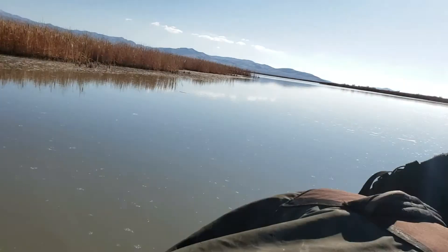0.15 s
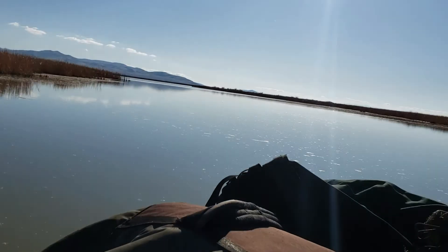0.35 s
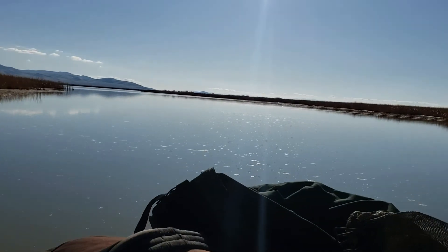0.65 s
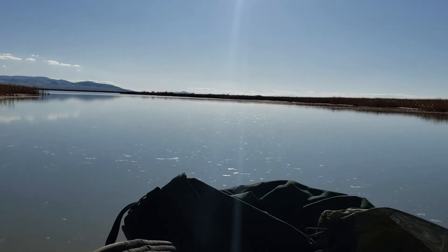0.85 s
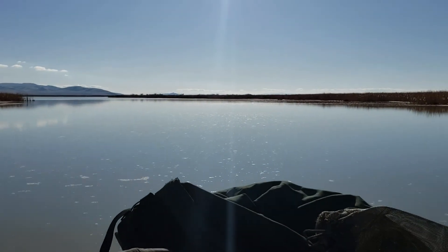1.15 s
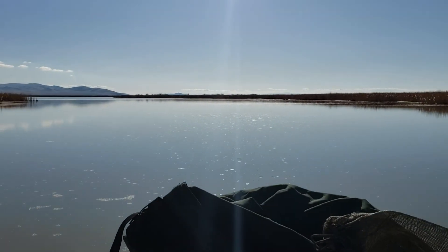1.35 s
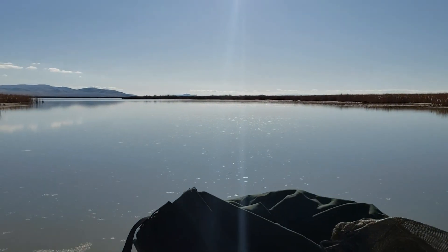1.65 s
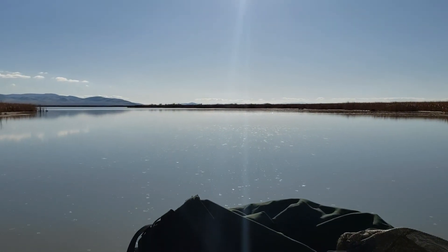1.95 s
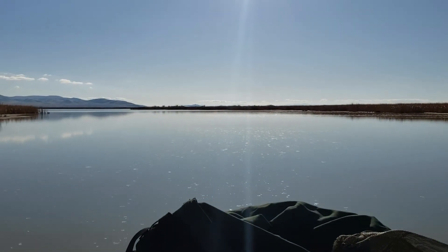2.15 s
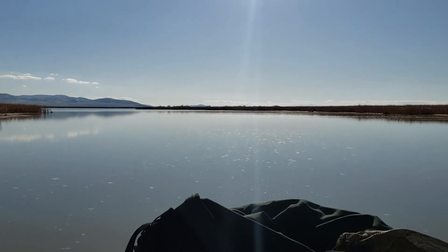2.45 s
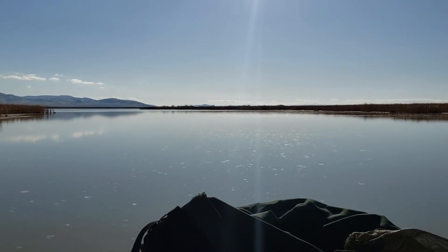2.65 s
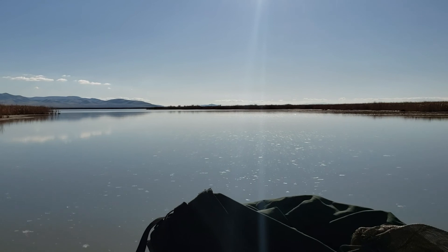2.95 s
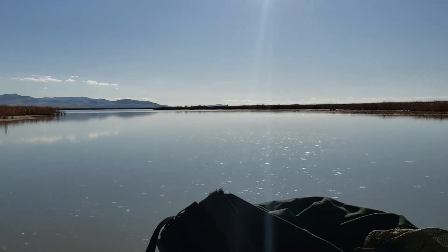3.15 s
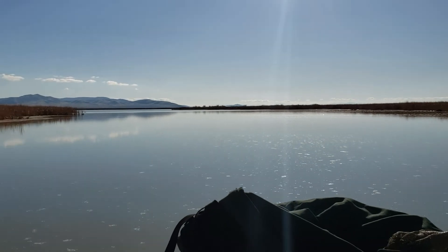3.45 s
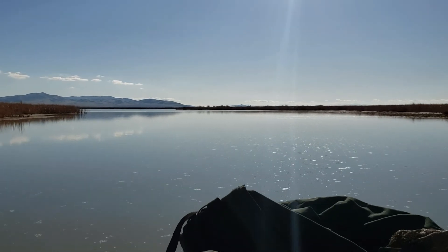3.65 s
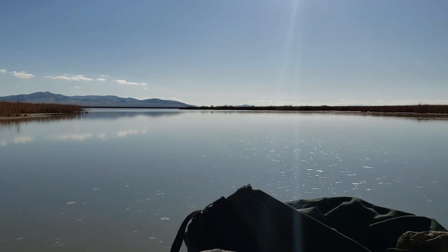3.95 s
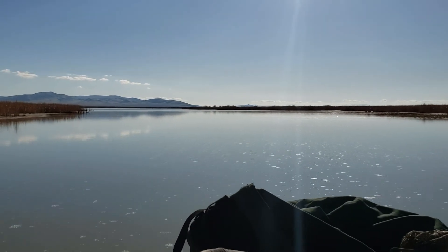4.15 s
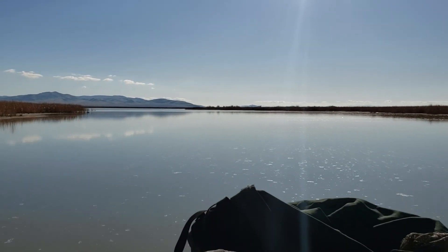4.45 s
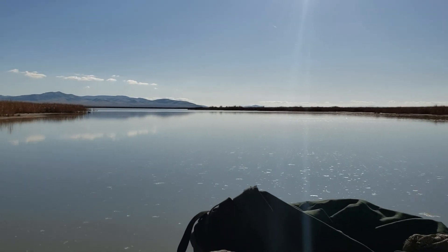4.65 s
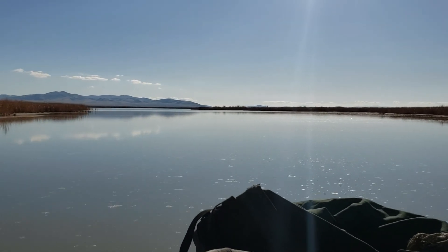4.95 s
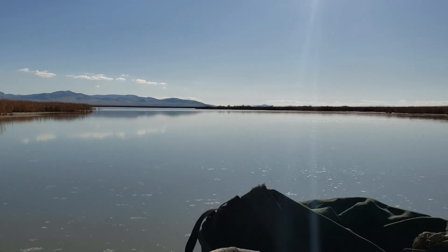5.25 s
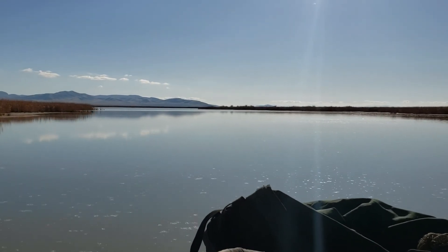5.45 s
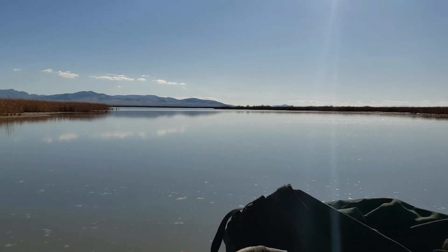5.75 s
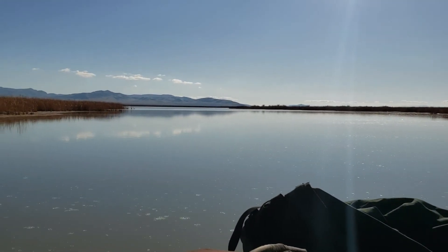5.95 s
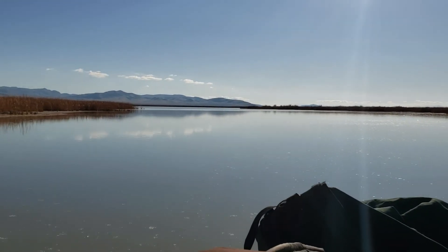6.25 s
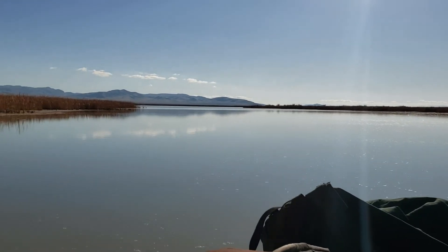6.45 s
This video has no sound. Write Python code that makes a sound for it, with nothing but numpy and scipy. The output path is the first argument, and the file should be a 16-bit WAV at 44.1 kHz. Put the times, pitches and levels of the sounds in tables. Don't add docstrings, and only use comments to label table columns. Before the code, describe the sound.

A two-cylinder boat engine runs flat out close behind a small open-air camera on a calm marsh. Its low throbbing drone hardly changes pitch, wrapped in rough block roar, mid-range whirr and quick valve clatter. Churned wake hisses briefly at the start, then a panel rattle swells around one second. Wind bumps the left and right microphones separately, most thickly from about two to three seconds.

```python
import sys
import numpy as np
from scipy import signal
from scipy.fft import rfft, irfft, next_fast_len
from scipy.io import wavfile
from scipy.ndimage import uniform_filter1d, map_coordinates

SR = 44100
rng = np.random.default_rng(int(sys.argv[2]) if len(sys.argv) > 2 else 0)


def wrap_up_sound(samples):
    columns = np.atleast_2d(samples).T
    tamed = np.clip(columns, -1, 1)
    steps = np.round(tamed * 32767).astype(np.int16)
    wavfile.write(sys.argv[1], SR, steps)


def convert_level_to_amplitude(level_db):
    exponent = np.asarray(level_db, float) / 20
    return 10 ** exponent


N = 291932

# t/s, firing cycle f/Hz, crank throb level/dB, exhaust bark level/dB
ENGINE_RUN = [(0.0, 33.42, -21.5, -23.5), (0.39, 33.24, -21.9, -23), (0.78, 33.55, -20.8, -23.5),
              (1.17, 33.23, -21, -23), (1.56, 33.3, -20.0, -22.5), (1.95, 32.96, -19, -23),
              (2.34, 33.49, -18.5, -23), (2.73, 33.46, -21, -23), (3.12, 33.2, -22.2, -23),
              (3.5, 33.07, -25, -23), (3.89, 33.279, -24.0, -23), (4.28, 33.1, -23.5, -23.5),
              (4.67, 33.1, -23.5, -22), (5.06, 33.2, -22, -22.5), (5.45, 33.09, -21.5, -21.5),
              (5.84, 33.27, -23.5, -21.5), (6.23, 33.045, -20.5, -21.4), (6.62, 33.14, -21, -22)]
# t/s, level/dB
SPRAY_LEVEL = [(0, -53), (.05, -54.5), (.3, -56), (.6, -60), (2.6, -60), (4.1, -58), (5.6, -55.5),
               (6.62, -56)]
# t/s, level/dB
SHUDDERS = [
    (.05, 1),
    (.16, 3),
    (.26, 5.5),
    (.83, -2),
    (1.0, 0),
    (1.18, 5),
    (1.34, 0),
    (1.88, 3),
    (3.91, 4.5),
    (4.1, 0),
]


def engine():
    cycle_hz, throb_db, bark_db = curves(ENGINE_RUN)
    spray_db, = curves(SPRAY_LEVEL)
    shudder_db = sum(db * bump(s, half_s=0.015) for s, db in SHUDDERS)
    shade_db = 3 * bump(0.38, half_s=0.17)
    turns = np.cumsum(cycle_hz + 0.0393 * wobble(12)) / SR - 0.025
    uneven_db = 1.1 * wobble(24)
    noise = block_roar(turns, throb_db, bark_db, shudder_db, shade_db)
    noise += whirr(turns, spray_db, shudder_db, shade_db)
    noise += valve_clatter(turns, spray_db)
    noise += spray(turns, spray_db)
    hull_shake_db = 0.39 * wobble(9)
    return exhaust(turns, throb_db, bark_db + uneven_db) + convert_level_to_amplitude(hull_shake_db) * noise


# order of the firing cycle, level/dB
EXHAUST_ORDERS = [(1, -25.5), (2, -0.5), (3, -10.5), (4, -11.5), (5, -4), (6, -7.5), (7, -16), (8, -19),
                  (9, -11.5), (10, -10), (11, -10.5), (12, -13), (13, -8.5), (14, -19), (15, -22),
                  (16, -26), (17, -20), (18, -21), (19, -19), (20, -20.5), (21, -32.5), (22, -21.5),
                  (23, -42), (24, -18.5), (25, -24.5), (26, -29), (27, -29.5), (28, -34), (29, -24),
                  (30, -26.5)]
# order of the firing cycle, rms level/dB
TOOTH_ORDERS = [(33, -49), (38, -58.5), (43, -55.5), (48, -51), (52, -53), (54, -55.5), (57, -51),
                (59, -58), (61, -46.5), (63, -53)]


def exhaust(turns, throb_db, bark_db):
    third_db = -35.5 + 0.46 * (throb_db + 20) + 2.8 * wobble(6.6)
    fourth_db = -36 - 1.05 * (throb_db + 22) + 2.8 * wobble(5.2)
    load_db = {1: throb_db, 2: throb_db, 3: third_db + 12.5, 4: fourth_db + 12}
    _, level = np.transpose(EXHAUST_ORDERS)
    fade = level[-1] - 0.37 * np.arange(1, 38)
    levels = np.concatenate([[0], level, fade])
    out = np.zeros((2, N))
    for k in range(1, 68):
        loose = min(k / 40, 1)
        phase = firing(k)
        if k > 14:
            phase += np.pi * k * k / 23
        slip = (0.15 * loose + 0.55 * (k > 13)) * wobble(3)
        drift_db = (0.79 + 1.9 * loose) * wobble(2.51)
        if k > 13:
            drift_db += 1.7 - 4 * abs(wobble(1.507))
        if k > 30:
            drift_db -= 3.9 + 6 * rng.random()
        out += tone(k, levels[k] + load_db.get(k, bark_db) + drift_db, turns, phase + slip)
    for k, db in TOOTH_ORDERS:
        phase = rng.uniform(0, 2 * np.pi) + 0.9 * wobble(8)
        out += tone(k, db + 2.5 * wobble(3.3), turns, phase)
    return out


def firing(k):
    pull, late_cycles, turn_rad = (0.8, 0.475, -2.94) if k < 8 else (0.55, 0.04, -3.13)
    pair = np.angle(1 - pull * np.exp(-2j * np.pi * k * 0.65))
    return pair - 2 * np.pi * k * late_cycles + turn_rad


def tone(k, db, turns, phase):
    port = ports(np.array(k * turns[-1] * SR / N))[:, None]
    return 2 ** 0.5 * convert_level_to_amplitude(db) * abs(port) * np.cos(2 * np.pi * k * turns + phase + np.angle(port))


# f/Hz, density level/dB per Hz
ROAR_SPECTRUM = [(150, -43), (250, -3.5), (307, -2.5), (425, -5), (509, -4.5), (630, -9), (713, -10),
                 (1010, -9.5), (1300, -14), (1690, -56), (2860, -120)]


def block_roar(turns, throb_db, bark_db, shudder_db, shade_db):
    db = -31 + 0.4 * (throb_db + 22) + 0.24 * (bark_db + 23.5)
    db += shudder_db - shade_db + 0.5 * wobble(6.6)
    swell = unit(beat(turns, at=0.25, once_db=0.9, twice_db=-0.84))
    return convert_level_to_amplitude(db) * swell * rush(ROAR_SPECTRUM, patchy_db=1.0)


# f/Hz, density level/dB per Hz
WHIRR_SPECTRUM = [(760, -38), (1300, -9), (1370, -6), (1490, -0.5), (1740, -3), (2060, -1), (2530, -4),
                  (2900, -9.5), (3770, -37), (6380, -120)]


def whirr(turns, spray_db, shudder_db, shade_db):
    db = -37.0 + 0.3 * (spray_db + 59.5) + 0.45 * shudder_db - 1.3 * shade_db + 0.6 * wobble(5)
    swell = unit(beat(turns, at=0.78, once_db=1.35, twice_db=0.3))
    return convert_level_to_amplitude(db) * swell * rush(WHIRR_SPECTRUM, patchy_db=0.8)


# f/Hz, density level/dB per Hz
CLATTER_SPECTRUM = [(1410, -19), (2400, 0.5), (3340, -1), (3780, -2.5), (4440, -6), (5490, -12.5),
                    (6730, -24.5), (7980, -36), (8600, -33.5), (11200, -66), (18900, -120)]


def valve_clatter(turns, spray_db):
    db = -43.5 + 0.84 * (spray_db + 59) + 0.52 * wobble(7)
    swell = unit(beat(turns, at=0.56, once_db=1.5, twice_db=1.2))
    return convert_level_to_amplitude(db) * swell * rush(CLATTER_SPECTRUM, patchy_db=0.56)


# f/Hz, density level/dB per Hz
SPRAY_SPECTRUM = [(5000, -60.5), (8200, -27), (8900, -9.5), (9800, -1), (10500, 0), (12000, 2), (13600, -2),
                  (14600, 1), (15200, 6), (15900, -1.5)]


def spray(turns, spray_db):
    swell = unit(beat(turns, at=0.53, once_db=1.0, twice_db=1.0))
    return convert_level_to_amplitude(spray_db + 2.5) * swell * rush(SPRAY_SPECTRUM, patchy_db=1.5)


def beat(turns, at, once_db, twice_db):
    angle = 2 * np.pi * (turns - at)
    swell_db = once_db * np.cos(angle) + twice_db * np.cos(2 * angle)
    return convert_level_to_amplitude(swell_db * (1 + 0.35 * wobble(31)))


# f/Hz, density level/dB per Hz
COWL_SPECTRUM = [(500, -60), (760, -14), (860, 0), (1000, -5), (1160, 1), (1300, -18), (1900, -70)]


def cowling():
    level = convert_level_to_amplitude(-36.5 + 2.5 * wobble(8)) * bump(1.14, half_s=0.45)
    return level * rush(COWL_SPECTRUM, patchy_db=2.5)


# f/Hz, density level/dB per Hz
WAKE_SPECTRUM = [(1200, -40), (1700, -2), (2500, 2), (3400, 3), (4000, -8), (5200, -10), (6500, -32),
                 (9000, -61)]


def wake():
    hold_s, fade_db_per_s = 0.16, 45
    db = -41.5 - fade_db_per_s * np.maximum(np.arange(N) / SR - hold_s, 0)
    return convert_level_to_amplitude(db + 1.5 * wobble(35)) * rush(WAKE_SPECTRUM, patchy_db=3.5)


# f/Hz, width/Hz, level/dB
CASING_MODES = [(646, 106, 5.5), (853, 63, 3.5), (1044, 260, 4.5), (1486, 160, 3.5), (1867, 40, 5),
                (2020, 27, 6), (2260, 110, 3.5), (2740, 80, -1.5), (4400, 780, 1.5)]
# f/Hz, likeness [0..1]
PORT_LIKENESS = [(200, 0.28), (600, 0.83), (1200, 0.2), (2000, 0.95), (2700, 0.48), (3800, 0.53),
                 (4100, 0.15), (4600, 0.65), (5200, 0.26), (5800, .35), (7000, .1), (15000, .08)]


def rush(spectrum, patchy_db):
    z = signal.stft(rng.standard_normal((2, N)), nperseg=512)[2]
    field = uniform_filter1d(rng.standard_normal(z.shape[1:]), size=5, axis=0)
    field = uniform_filter1d(field, size=12, axis=1)
    pair = signal.istft(z * convert_level_to_amplitude(patchy_db * unit(field)), nperseg=512)[1][:, :N]

    def mid_side(hz):
        modes_db = sum(db / (1 + (2 * (hz - c) / w) ** 2) for c, w, db in CASING_MODES)
        turn = np.arccos(np.clip(along(PORT_LIKENESS, hz), 0, 1)) / 2
        return convert_level_to_amplitude(along(spectrum, hz) + modes_db) * [np.cos(turn), np.sin(turn)]

    mid, side = filtered(pair, mid_side)
    both = filtered(np.array([mid + side, mid - side]), ports)
    return both / np.std(both.mean(0))


# f/Hz, lead/rad
PORT_LEAD = [(0, -0.5), (780, 0.82), (1030, 0.5), (1640, 0.97), (2070, 1.27), (2670, 3.5), (3620, 4),
             (3960, 4), (4310, 0), (4570, -0.5), (4820, 1.24), (8440, 9.5), (9470, 10.5), (9910, 19.5),
             (11300, 21), (11700, 21), (12600, 26), (13500, 28.5), (14800, 29), (16500, 35)]
# f/Hz, level/dB
PORT_BALANCE = [(60, 4), (200, 2), (380, 4.5), (700, 1), (1300, 3.5), (2400, 0), (3600, -0.5), (4500, -8.5),
                (5500, 4), (7200, 12.5), (8200, 8.5), (9500, 2.5), (13500, 2.5), (15300, 9.5)]


def ports(hz):
    lead_rad = np.interp(hz, *np.transpose(PORT_LEAD))
    half = convert_level_to_amplitude(along(PORT_BALANCE, hz) / 2) * np.exp(0.5j * lead_rad)
    return np.array([half, 1 / half])


# t/s, level/dB
HEADWIND_LEVEL = [(0, -30), (.1, -27), (.2, -23), (.32, -28), (.45, -32), (.9, -33.5), (1.9, -26.5),
                  (2.3, -26), (2.75, -30), (3.2, -30.5), (3.7, -32), (5.2, -32), (6.1, -28.5), (6.35, -30),
                  (6.47, -24), (6.62, -27)]
# f/Hz, density level/dB per Hz
BUFFET_SPECTRUM = [(18, -17), (30, -9.5), (50, 3.5), (85, 6.5), (140, 5), (220, 1.5), (350, -10.5),
                   (600, -22), (1200, -53), (2500, -120)]
# t/s, peak level/dB, f/Hz
LEFT_THUMPS = [(0.212, -18.0, 113.0), (0.434, -19, 130.0), (1.543, -22, 135.0), (1.654, -19.0, 125.0),
               (1.788, -14, 95.0), (1.868, -20, 174.9), (2.207, -12, 128.0), (2.268, -16, 99.0),
               (2.336, -18.5, 131.1), (2.432, -16, 93.0), (2.503, -19, 140.0), (2.643, -18.0, 133.0),
               (2.921, -14.0, 165.0), (3.047, -15.0, 105.0), (3.155, -20, 122.0), (3.261, -17.0, 124.0),
               (3.337, -19, 117.0), (3.45, -23, 172.0), (3.929, -14.5, 111.0), (4.273, -17, 138.0),
               (4.935, -13.5, 114.0), (5.794, -22, 132), (6.121, -19, 121.0), (6.248, -19, 97.0),
               (6.478, -15, 85.0)]
# t/s, peak level/dB, f/Hz
RIGHT_THUMPS = [(0.195, -15, 193.0), (1.058, -19, 111.0), (1.325, -16.5, 103.0), (1.602, -21, 88.0),
                (1.74, -15.0, 94.0), (1.839, -21, 141.0), (1.931, -13.5, 121.0), (2.187, -17, 82.0),
                (2.264, -20.0, 151.0), (2.558, -22.0, 137.0), (2.633, -19.0, 96.0), (2.879, -18, 139.0),
                (3.046, -23, 96.0), (3.11, -18.0, 114.0), (3.257, -22.0, 130.1), (4.89, -19.0, 108.0),
                (5.767, -23, 161.0), (5.877, -24, 116.0), (5.996, -19.0, 136.9), (6.156, -20.0, 106.0),
                (6.231, -24, 141.1), (6.462, -14, 106.0)]


def wind():
    push_s, push_db, puff_s, puff_db = 0.0054, 3.5, 0.03, -7
    leak = 0.29
    lumps_db = 3.3 * np.array([wobble(22), wobble(19)])
    power = convert_level_to_amplitude(1.95 * (curves(HEADWIND_LEVEL)[0] + lumps_db))
    push = np.zeros((2, N))
    for port, thumps in enumerate((LEFT_THUMPS, RIGHT_THUMPS)):
        for s, db, hz in thumps:
            power[port] += convert_level_to_amplitude(2 * (db + puff_db)) * bump(s, puff_s)
            swing = 2 * np.pi * (0.82 * hz * (np.arange(N) / SR - s) + rng.random())
            push[port] += convert_level_to_amplitude(db + push_db) * bump(s, push_s) * np.sin(swing)
    air = unit(filtered(rng.standard_normal((2, N)), lambda hz: convert_level_to_amplitude(along(BUFFET_SPECTRUM, hz))))
    return np.sqrt(power) * air + push + leak * push[::-1]


def unit(x):
    return x / np.sqrt(np.mean(x ** 2) + 1e-20)


def along(points, hz):
    f, v = np.transpose(points)
    return np.interp(np.log(hz + 1), np.log(f + 1), v)


def curves(rows):
    s, *cols = np.transpose(rows)
    return [np.interp(np.arange(N) / SR, s, c) for c in cols]


def wobble(rate_hz):
    knots = rng.standard_normal(int(N * rate_hz / SR) + 4)
    return map_coordinates(knots, [np.arange(N) * rate_hz / SR], order=1)


def bump(at_s, half_s):
    out = np.zeros(N)
    start = max(round((at_s - 5 * half_s) * SR), 0)
    stop = min(round((at_s + 5 * half_s) * SR), N)
    t = np.arange(start, stop) / SR
    out[start:start + len(t)] = np.exp(-0.5 * ((t - at_s) / half_s) ** 2)
    return out


def filtered(x, response):
    m = next_fast_len(N + 8192)
    return irfft(rfft(x, m) * response(np.fft.rfftfreq(m, 1 / SR)), m)[..., :N]


def scene():
    return engine() + cowling() + wake() + wind()


def top_cut(x):
    return signal.sosfilt(signal.butter(12, 15870, fs=SR, output="sos"), x)


def record(dry):
    top_hz = 15870
    mix = filtered(dry, lambda hz: hz < top_hz)
    return top_cut(mix)


dry = scene()
out = record(dry)
wrap_up_sound(out)
```